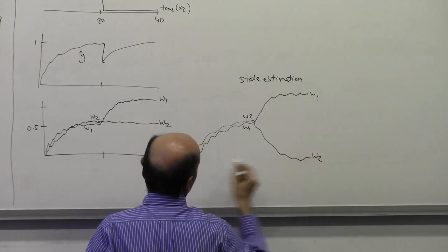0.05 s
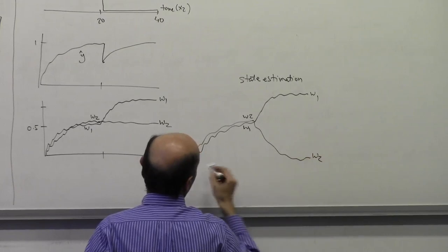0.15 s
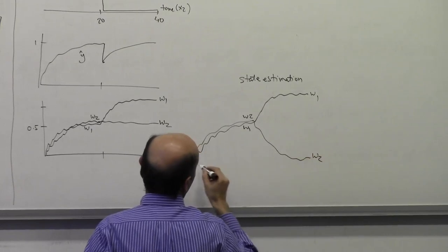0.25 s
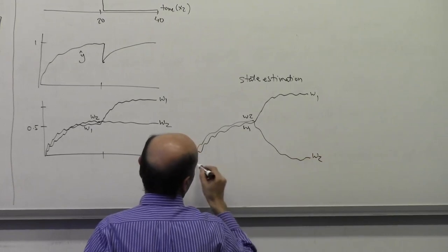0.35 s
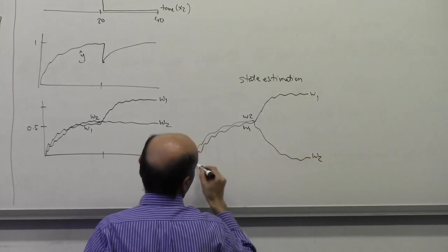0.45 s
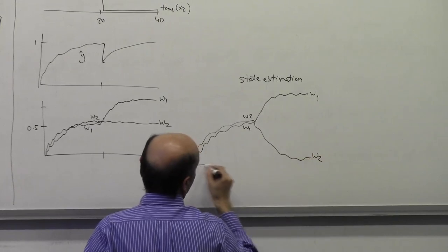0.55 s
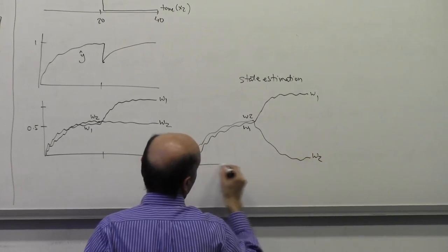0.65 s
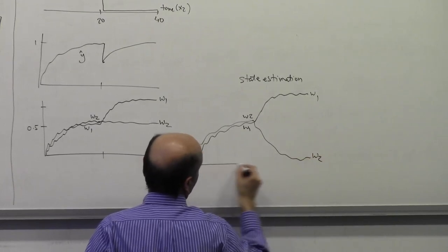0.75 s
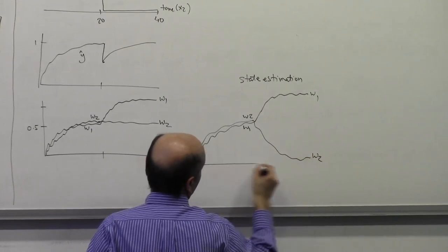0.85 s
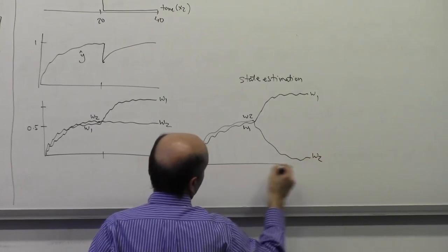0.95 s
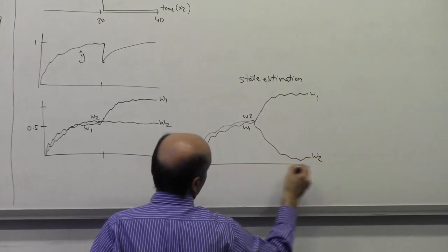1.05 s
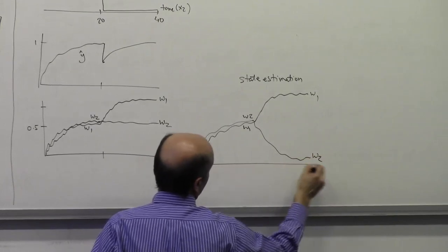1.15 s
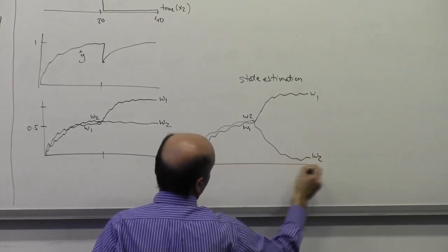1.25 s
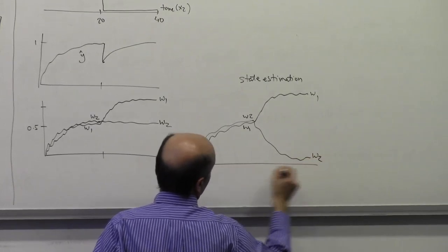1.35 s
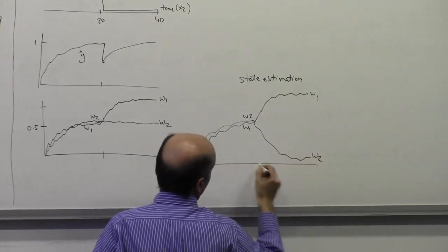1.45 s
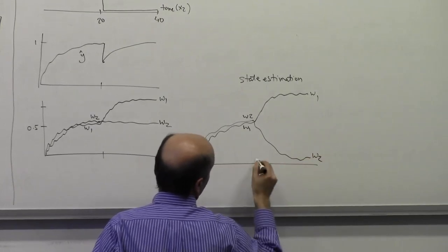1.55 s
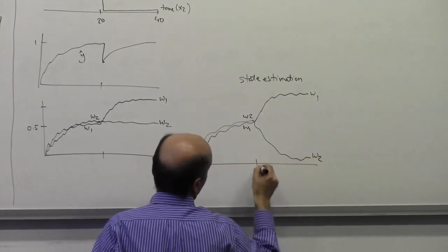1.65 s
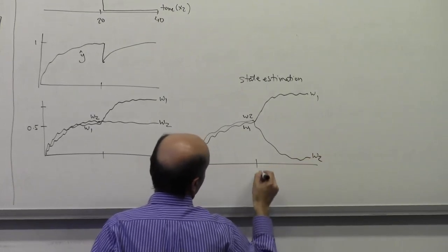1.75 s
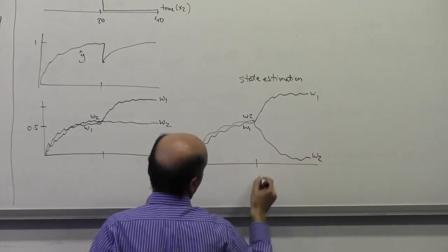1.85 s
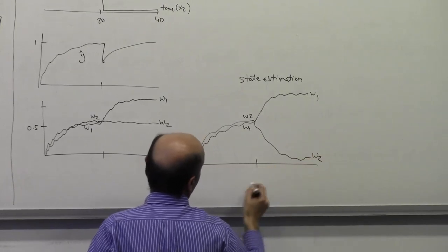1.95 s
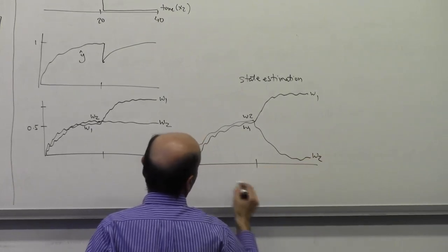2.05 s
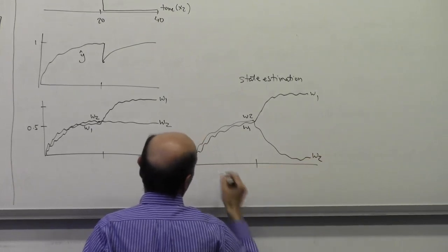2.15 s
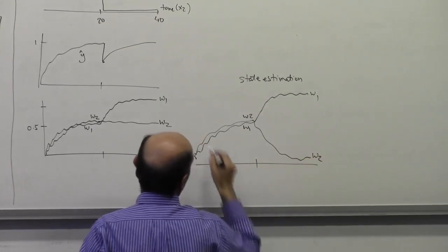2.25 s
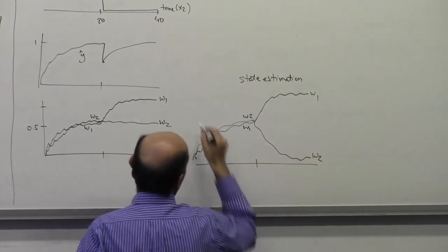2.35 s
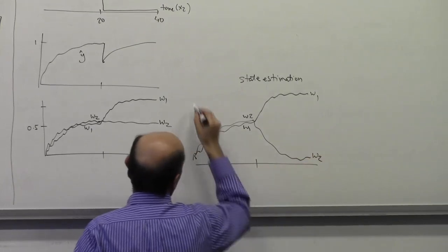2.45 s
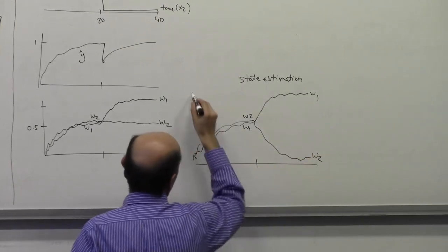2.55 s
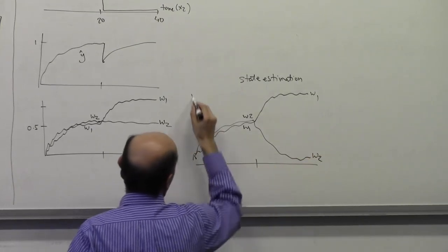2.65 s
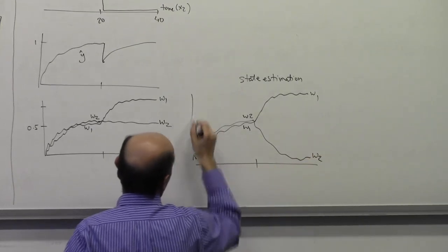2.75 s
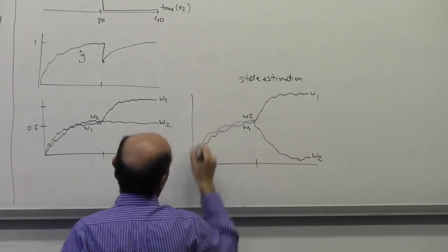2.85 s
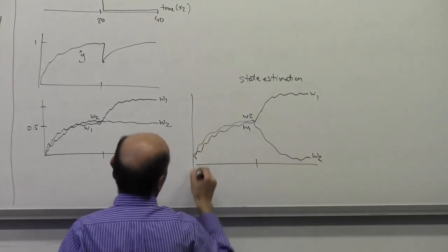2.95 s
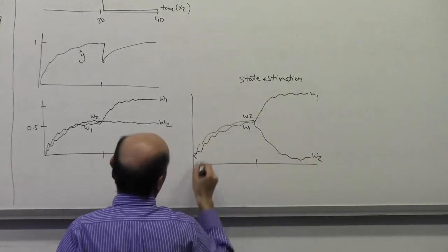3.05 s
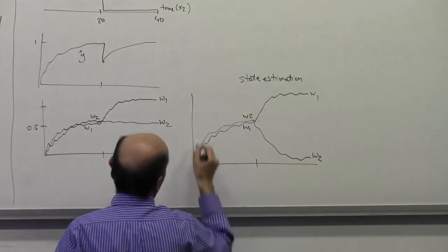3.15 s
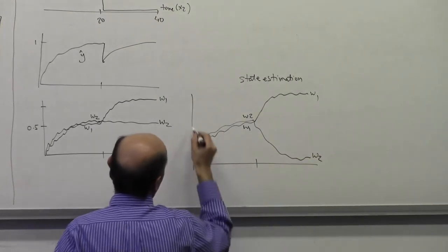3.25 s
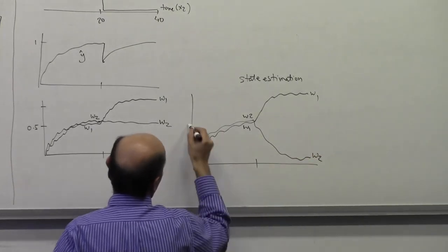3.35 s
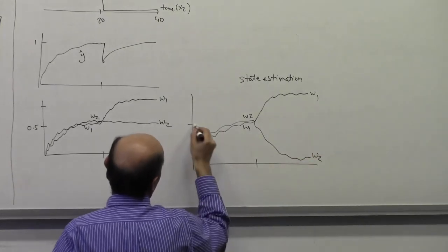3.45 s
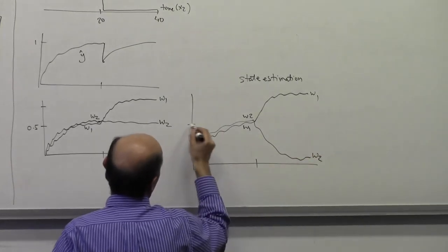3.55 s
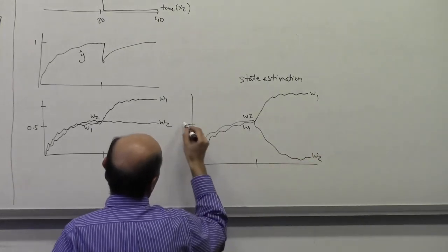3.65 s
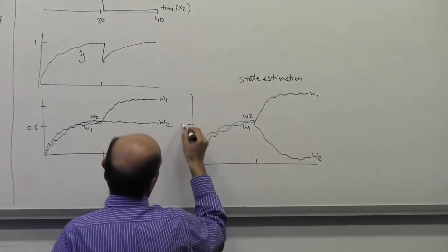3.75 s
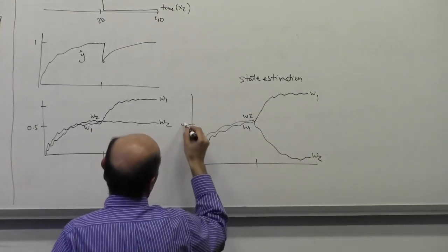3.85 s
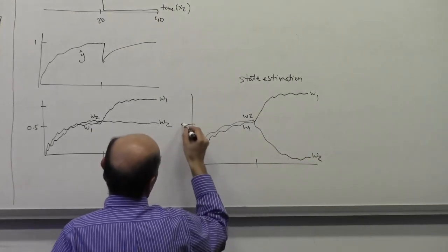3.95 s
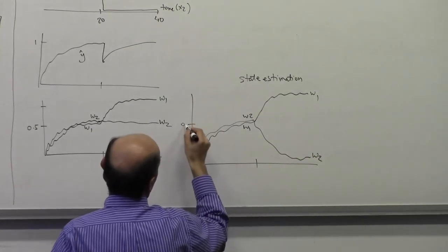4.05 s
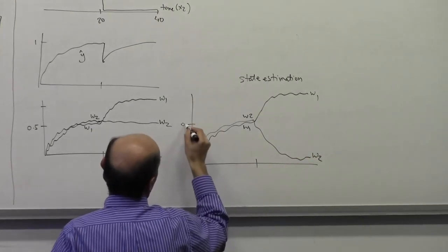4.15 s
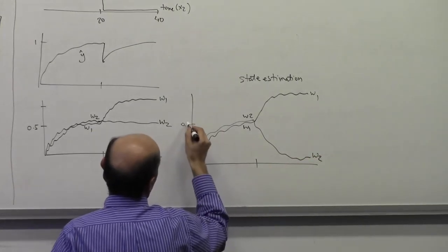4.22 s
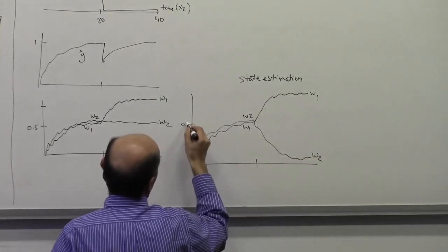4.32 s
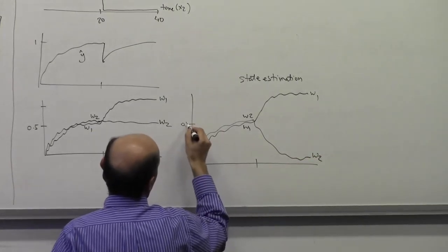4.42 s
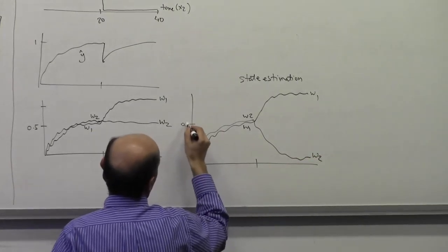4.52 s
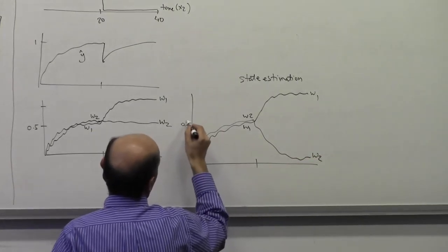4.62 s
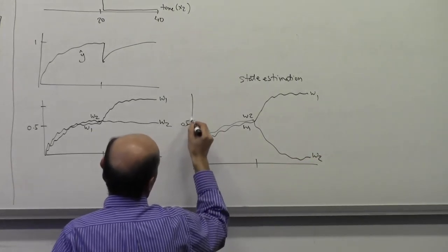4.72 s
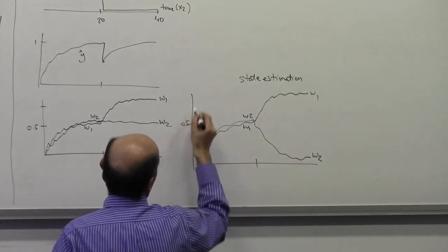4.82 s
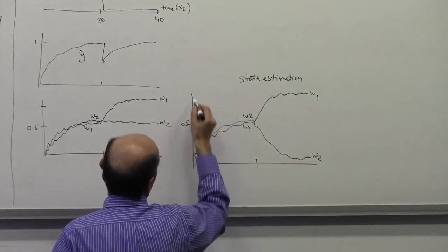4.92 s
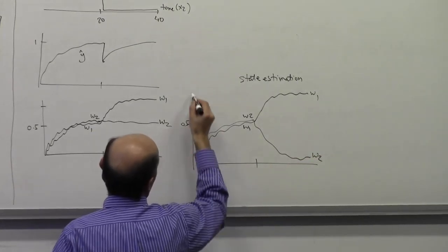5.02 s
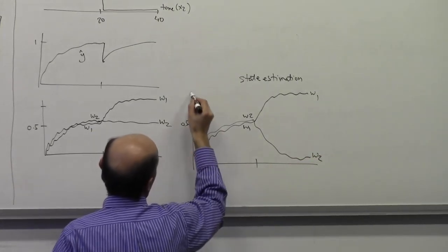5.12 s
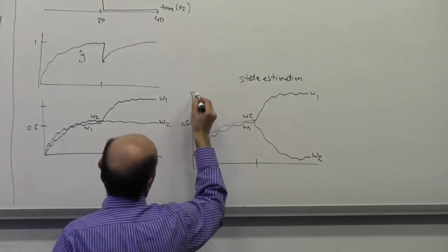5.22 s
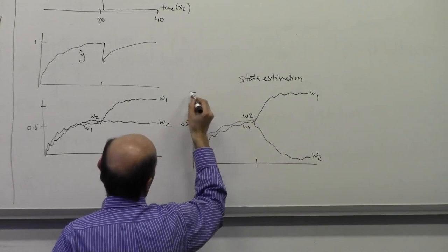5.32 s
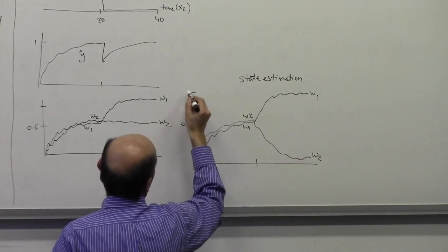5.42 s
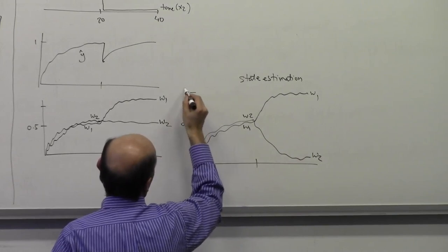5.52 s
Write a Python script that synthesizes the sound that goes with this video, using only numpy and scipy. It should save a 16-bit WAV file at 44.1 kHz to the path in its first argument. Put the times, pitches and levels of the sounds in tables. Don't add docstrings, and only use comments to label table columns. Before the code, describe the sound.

Hollow marker taps and short, dry felt strokes on a wall board in a quiet room with deep air rumble and thin hiss.

```python
import sys
import numpy as np
from scipy import signal
from scipy.fft import rfft, irfft, next_fast_len
from scipy.io import wavfile
from scipy.ndimage import uniform_filter1d, map_coordinates

SR = 44100
rng = np.random.default_rng(int(sys.argv[2]) if len(sys.argv) > 2 else 0)


def put_to_file(sound):
    columns = np.atleast_2d(sound).T
    safe = np.clip(columns, -1, 1)
    whole_steps = np.round(safe * 32767)
    wavfile.write(sys.argv[1], SR, whole_steps.astype(np.int16))


def level_to_linear(level):
    exponent = np.asarray(level, float) / 20
    return 10 ** exponent


N = 246078

# [t/s, tick level/dB, then levels against the tick:
# low panel/dB, middle panel/dB, barrel/dB]
TAPS = [
    (2.005, -51.5, 12, 6, -6.5),
    (3.445, -22.5, 3, -9, -25.5),
    (3.778, -21, 1.5, -11.5, -30),
    (4.124, -17.5, -0.6, -10, -30),
    (4.367, -23, 2.5, -11, -31),
    (4.655, -25, 2.5, -9.5, -31.5),
]
# [t/s, twin low mode level/dB, bright barrel level/dB]
LANDING_PLACE = [(2.6, -3, -26), (3.4, 2.5, -22.5), (4.1, 2.5, -24.5), (4.7, 2.5, -36)]
# [f/Hz, level/dB, time to fall 60 dB/s, lag/ms, sign]
PANEL_LOW = [(295, 3, 0.11, 2.67, -1), (176.6, -16, 0.17, 2.95, -1), (239, -12.5, 0.25, 3.8, -1)]
PANEL_TWIN = [(338.8, 1.6, 0.1, 2.53, -1)]
PANEL_MIDDLE = [(470.3, 2.6, 0.12, 3.09, 1), (521, 7, 0.067, 2.6, 1)]
PANEL_HIGH = [(618, 6.5, 0.037, .01, -1), (650, 3, 0.009, .01, -1), (860, -18, 0.056, 1.5, 1)]
BARREL_LOW = [(1166, 13.7, 0.027, 0.88, 1), (1337, 0.5, 0.073, 0.52, -1)]
BARREL_BRIGHT = [(1786, 4.3, 0.049, 2.8, 1)]

# [t/s, body level/dB, tick level/dB]
RAIL_TAPS = [
    (0.479, -25.5, -35),
    (1.6554, -13, -18.5),
]
# [t/s, body level/dB, tick level/dB]
REACH_TAPS = [
    (2.6628, -14, -14.5),
    (5.169, -17.5, -21.5),
]
# [f/Hz, level/dB, time to fall 60 dB/s, lag/ms, sign]
RAIL_BODY = [(282.5, -5, 0.15, 3.76, 1), (299.6, -5.5, 0.11, 4.28, 1), (466, -7.5, 0.052, 4.45, 1)]
RAIL_TICK = [(646, 0.5, 0.012, .01, -1), (444, -12, .015, .01, -1), (950, -8.5, 0.024, 0.15, -1),
             (1257, -14.5, 0.066, 0.28, 1)]
REACH_BODY = [(295.5, -2, 0.13, 3.03, 1), (343.4, -6.5, .13, 3.3, 1), (461, -18, 0.13, 2.96, 1),
              (224, -31, 0.11, 5.3, 1)]
REACH_TICK = [(537, 2.5, 0.019, .01, -1), (752, -9, 0.043, 0.19, 1), (1810, -15, .05, 1.37, 1)]

# [t/s, length/s, hiss level at start/dB, at end/dB, nib whistle level against the hiss/dB]
STROKES = [
    (0.575, 0.29, -54, -54, -5),
    (0.897, 0.335, -52.5, -52, -10),
    (1.68, 0.045, -56, -58, -5),
    (2.725, 0.14, -57, -56, -8),
    (2.899, 0.11, -54, -48.5, -11),
    (3.48, 0.043, -55, -56, -1.5),
    (3.82, 0.13, -64, -61, -2),
    (4.37, 0.21, -67, -64, -10),
    (4.689, 0.027, -57, -59, 2),
    (5.205, 0.037, -58, -58, 2),
]
# [f/Hz, level per Hz/dB]
FELT_COLOUR = [(1500, -11.5), (3000, -1), (4000, 0), (6000, -6.5), (7200, 1), (9000, 3.5), (11300, -0.5),
               (12300, -8), (16000, -25)]
# [t/s, extra path of the echo/ms, echo share 0-1, nib whistle f/Hz]
HAND = [(.57, 0.4, 0.56, 6400), (.7, 0.39, .65, 6300), (.83, 0.353, 0.35, 6330), (.92, 0.305, 0.6, 6400),
        (1.25, 0.25, 0.34, 5900), (1.7, 0.29, 0.3, 5150), (2.75, 0.26, 0.35, 5500), (3.0, 0.3, 0.04, 6000),
        (3.5, 0.31, 0.1, 5300), (4.7, 0.3, .4, 5350), (5.2, 0.3, .5, 5900)]
# [t/s, length/s, level/dB]
JUDDERS = [(0.83, 0.05, -64), (1.19, 0.03, -65), (2.715, 0.03, -64), (2.822, 0.042, -58),
           (2.888, 0.07, -65), (3.5, 0.03, -65), (3.79, 0.025, -58), (3.902, 0.05, -58), (4.371, 0.12, -63),
           (4.69, 0.022, -61), (5.22, 0.034, -69)]

# [t/s, length/s, level/dB]
SLEEVE = [
    (0.105, 0.027, -54),
    (0.16, 0.012, -56),
    (0.245, 0.015, -62),
    (2.3, 0.22, -63.5),
    (2.555, 0.007, -50),
]
# [f/Hz, level per Hz/dB]
CLOTH_COLOUR = [(400, -3), (880, 3), (1200, -6), (1800, 0.5), (3000, -6.5), (5000, -13), (8000, -16),
                (12000, -20)]

# [t/s, level/dB]
DRAUGHT = [(0.0, -35.5), (1.96, -36.5), (2.25, -42), (3.01, -39.5), (3.06, -43), (3.36, -39), (5.53, -33.5),
           (5.58, -29)]
# [f/Hz, level per Hz/dB]
RUMBLE_COLOUR = [(8, -52), (14, -3.5), (25, 3), (31, -8), (40, 3), (50, -23)]
BOOM_COLOUR = [(40, -17), (47, -12), (54, -0.5), (59, -2.5), (66, -8.5), (80, -8), (92, -21.5), (100, -20)]
AIR_COLOUR = [(88, 1.5), (100, -3), (129, -2), (156, -4), (188, -2.5), (220, -11.5), (252, -12.5),
              (334, -12.5), (392, -14.5), (593, -24), (643, -21), (1030, -28.5), (1340, -26), (1500, -32.5),
              (2500, -42)]
# [t/s, f/Hz, level/dB]
FAN_WHINE = [(0, 1388, -71), (1.2, 1390, -67.5), (2.8, 1389, -70), (3.7, 1382, -63), (3.85, 1370, -77),
             (4.15, 1374, -63), (5.36, 1346, -59), (5.45, 1350, -65), (5.58, 1350, -64)]
# [f/Hz, level/dB]
MOTOR_TONES = [(120, -49), (1073, -75), (1212, -73.5), (3952, -89)]

# [t/s, level/dB]
HISS_WANDER = [(0, -66.5), (0.8, -66), (1.4, -66.5), (2.72, -66.5), (2.95, -65), (3.4, -65.5), (4.8, -66.5),
               (5.4, -67)]
# [f/Hz, level per Hz/dB]
HISS_COLOUR = [(700, -55), (1300, -4), (1700, -1), (2400, -0.5), (3550, -0.5), (6000, -2), (7200, -2.5),
               (9000, -3), (12000, -4.5), (15000, -5.5), (15800, -7), (16000, -36)]
HISS_THROB = [(2, .07), (4, .04), (6, .22), (12, .02)]
# [f/Hz, level per Hz/dB]
APART_COLOUR = [(12, -24), (20, 2), (59, -10), (107, -5), (145, -6), (187, 0), (227, -5), (292, -2),
                (1150, -5), (2060, -8), (8550, -8.5), (14500, -11.5), (15800, -13)]

LEAD_S = 0.00094


def taps():
    t, tick_db, low_db, middle_db, barrel_db = np.transpose(TAPS)
    place_t, place_twin_db, place_bright_db = np.transpose(LANDING_PLACE)
    twin_db = np.interp(t, place_t, place_twin_db)
    bright_db = np.interp(t, place_t, place_bright_db)
    t = t - LEAD_S
    panel = strike(PANEL_LOW, t, tick_db + low_db)
    panel += strike(PANEL_TWIN, t, tick_db + low_db + twin_db)
    panel += strike(PANEL_MIDDLE, t, tick_db + middle_db)
    panel += strike(PANEL_HIGH, t, tick_db)
    pen = strike(BARREL_LOW, t, tick_db + barrel_db)
    pen += strike(BARREL_BRIGHT, t, tick_db + bright_db)
    return soften(panel, 3, 720) + soften(pen, 2, 2200)


def edge_taps(landings, body, tick, contact_hz):
    t, body_db, tick_db = np.transpose(landings)
    blow = strike(body, t - LEAD_S, body_db) + strike(tick, t - LEAD_S, tick_db)
    return soften(blow, 3, contact_hz)


def strokes():
    path_ms, share, nib_hz = in_time(HAND)
    felt = coloured(FELT_COLOUR) * level_to_linear(1.2 * drift(24.9))
    echo_at = np.arange(N) - path_ms * SR / 1000
    for _ in range(2):
        echo = map_coordinates(felt, [echo_at], order=3)
        echo = uniform_filter1d(echo, size=3)
        felt = felt - np.clip(share, 0, 1) * echo
    nib = whistle(nib_hz, 590)
    barrel = whistle(1770, 67) + level_to_linear(-6.0) * whistle(1200, 46)

    out = np.zeros(N)
    for start, length, level_db in JUDDERS:
        out += level_to_linear(level_db) * gesture(start, length, rise_s=0.03, fall_s=0.03) * barrel
    for start, length, start_db, end_db, nib_db in STROKES:
        level_db, = in_time([(start, start_db), (start + length, end_db)])
        slide = level_to_linear(level_db) * gesture(start, length, rise_s=0.03, fall_s=0.061)
        out += slide * (level_to_linear(-3.5) * felt + level_to_linear(nib_db - 1.5) * nib)
    return out


def sleeve():
    moving = np.zeros(N)
    for start, length, level_db in SLEEVE:
        moving += level_to_linear(level_db) * gesture(start, length, rise_s=0.8 * length, fall_s=1.8 * length)
    return moving * level_to_linear(4.8 * drift(30.35)) * coloured(CLOTH_COLOUR)


def room(x):
    t60_s, wall_cut_hz = 0.51, 520
    size = next_fast_len(N + SR)
    w = 2 * np.pi * np.arange(size // 2 + 1) / size
    t60 = t60_s / (1 + w * SR / (2 * np.pi * wall_cut_hz))
    lags = np.geomspace(0.024, 0.065, num=16) * rng.uniform(0.97, 1.03, size=16) * SR
    tail = 0
    for k, lag in enumerate(lags):
        once_round = level_to_linear(-60 * lag / SR / t60) * np.exp(-1j * w * lag)
        tail = tail + (-1) ** k * once_round / (1 - once_round)
    for lag_s in (0.0017, 0.0043, 0.0089):
        turn = np.exp(-1j * w * lag_s * SR)
        tail = tail * (turn - 0.6) / (1 - 0.6 * turn)
    return irfft(rfft(x, size) * tail, size)[:N]


def ventilation():
    rumble_db, = in_time(DRAUGHT)
    swing_db = rumble_db - rumble_db.mean()
    rumble = level_to_linear(rumble_db) * coloured(RUMBLE_COLOUR)
    boom = level_to_linear(-34.5 + 0.35 * swing_db) * coloured(BOOM_COLOUR)
    air = level_to_linear(-42 + 0.044 * swing_db + 0.16) * coloured(AIR_COLOUR)
    return rumble + boom + air


def fan():
    whine_hz, whine_db = in_time(FAN_WHINE)
    turn = 2 * np.pi * np.cumsum(whine_hz + 1.63 * drift(7.7)) / SR
    out = np.sqrt(2) * level_to_linear(whine_db + 1.04 * drift(13)) * np.sin(turn)
    t = np.arange(N) / SR
    for hz, level_db in MOTOR_TONES:
        tone = np.sin(2 * np.pi * hz * t + 1.75 * drift(4))
        out += np.sqrt(2) * level_to_linear(level_db + 1.1 * drift(5.13)) * tone
    return out


def preamp_hiss():
    mains_hz = 59.98
    hiss_db, = in_time(HISS_WANDER)
    turn = 2 * np.pi * mains_hz * np.arange(N) / SR
    throb = 1 + sum(depth * np.cos(round(k) * turn) for k, depth in HISS_THROB)
    return level_to_linear(hiss_db + 9.5) * throb * coloured(HISS_COLOUR)


def strike(modes, t, db):
    out = np.zeros(N)
    for hz, level_db, t60, lag_ms, sign in modes:
        clicks = np.zeros(N)
        at = np.round((t + lag_ms / 1000) * SR).astype(int)
        clicks[at] = np.sign(sign) * level_to_linear(db + level_db)
        out += ring(clicks, hz, t60)
    return out


def ring(clicks, hz, t60):
    r, w = level_to_linear(-60 / (t60 * SR)), 2 * np.pi * hz / SR
    return signal.lfilter([0, np.sin(w)], [1, -2 * r * np.cos(w), r * r], clicks + 1e-18)


def soften(x, order, cut_hz):
    return signal.sosfilt(signal.butter(order, cut_hz, fs=SR, output="sos"), x)


def whistle(hz, width_hz):
    slow = soften(rng.standard_normal((2, N)), 2, width_hz)
    turn = 2 * np.pi * np.cumsum(hz + np.zeros(N)) / SR
    return rms_one(slow[0] * np.cos(turn) + slow[1] * np.sin(turn))


def gesture(start, length, rise_s, fall_s):
    corners = [start - rise_s, start, start + length, start + length + fall_s]
    return np.interp(np.arange(N) / SR, corners, [0, 1, 1, 0]) ** 2


def coloured(spectrum):
    size = next_fast_len(N)
    hz, db = np.transpose(spectrum)
    grid = np.maximum(np.arange(size // 2 + 1) * SR / size, 1)
    gain = level_to_linear(np.interp(np.log(grid), np.log(hz), db, left=-120, right=-120))
    return rms_one(irfft(rfft(rng.standard_normal(size)) * gain, size)[:N])


def drift(rate):
    knots = rng.standard_normal(size=250)
    at = np.arange(0, N + 64, 64) / SR * rate + 2
    coarse = map_coordinates(knots, [at], order=3, mode="wrap")
    return np.interp(np.arange(N) / 64, np.arange(len(coarse)), coarse)


def in_time(rows):
    t, *columns = np.transpose(rows)
    return [np.interp(np.arange(N) / SR, t, column) for column in columns]


def rms_one(x):
    return x / np.sqrt(np.mean(x ** 2) + 1e-20)


def scene():
    board = taps() + strokes()
    board += edge_taps(REACH_TAPS, REACH_BODY, REACH_TICK, contact_hz=870)
    rail = edge_taps(RAIL_TAPS, RAIL_BODY, RAIL_TICK, contact_hz=1110)
    into_room = board + level_to_linear(-13) * rail
    middle = board + rail + level_to_linear(-22) * room(into_room) + sleeve()
    middle += ventilation() + fan() + preamp_hiss()
    apart = level_to_linear(-61.5) * coloured(APART_COLOUR)
    return np.array([middle + apart, middle - apart])


def roll_off(x):
    return signal.sosfilt(signal.butter(12, 15780, fs=SR, output="sos"), x)


def record(dry):
    steep = signal.ellip(14, 0.3, 80, 15780, fs=SR, output="sos")
    mix = signal.sosfilt(steep, dry)
    return roll_off(mix)


dry = scene()
out = record(dry)
put_to_file(out)
```